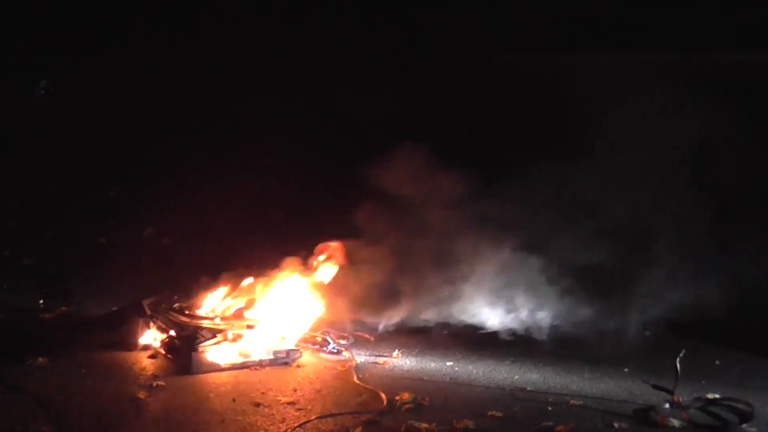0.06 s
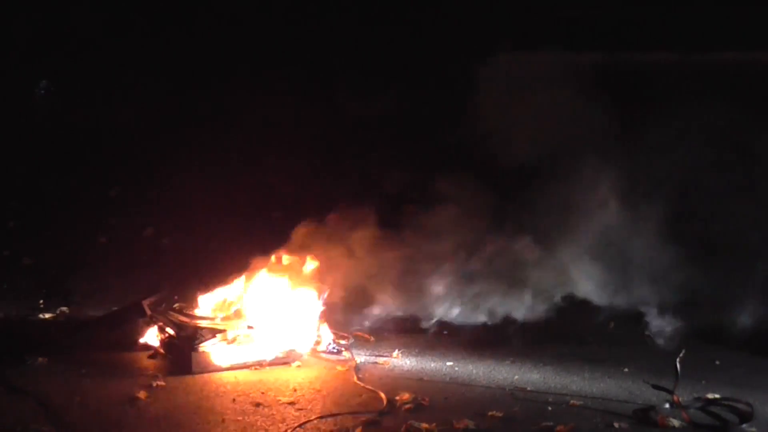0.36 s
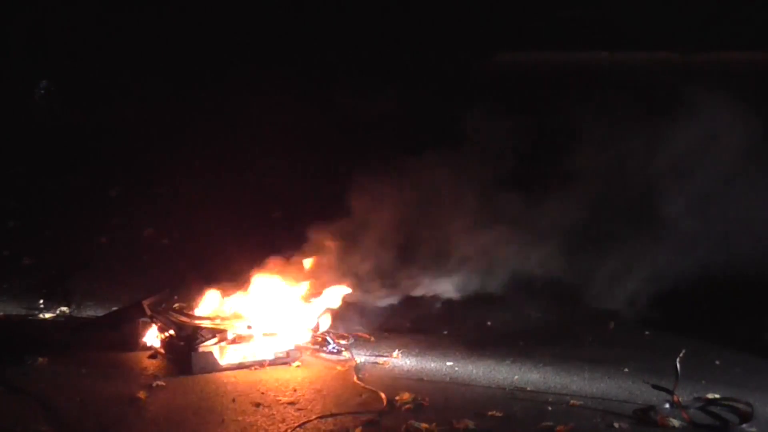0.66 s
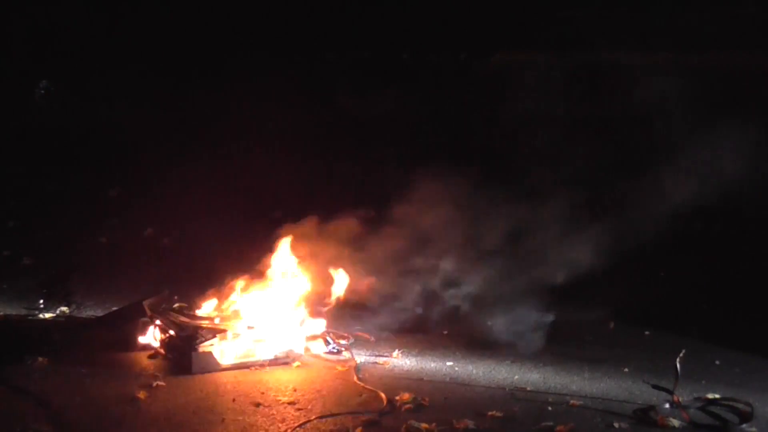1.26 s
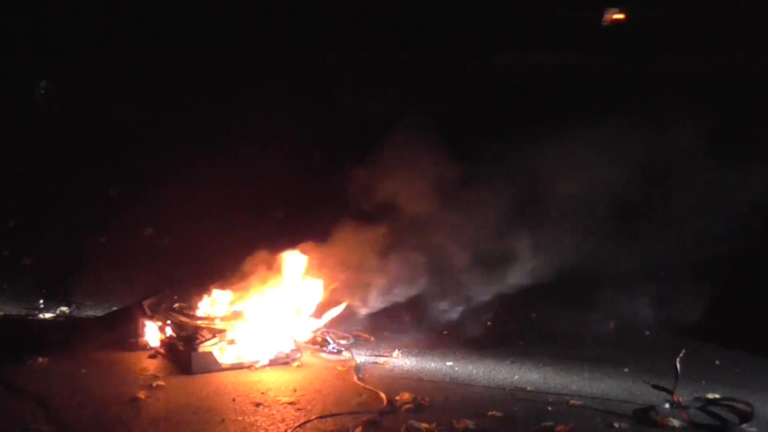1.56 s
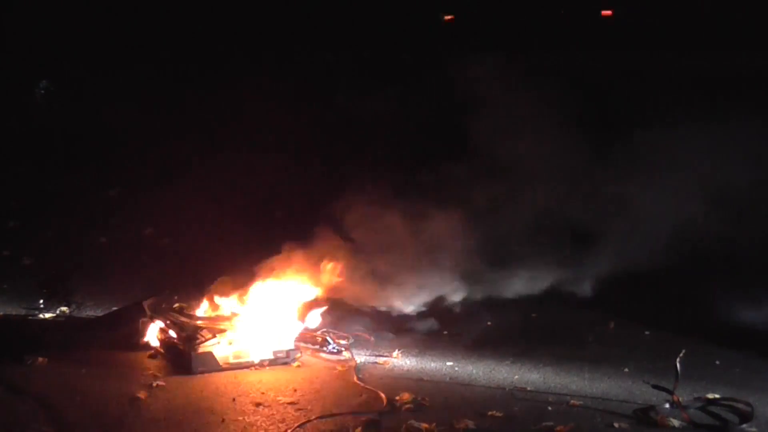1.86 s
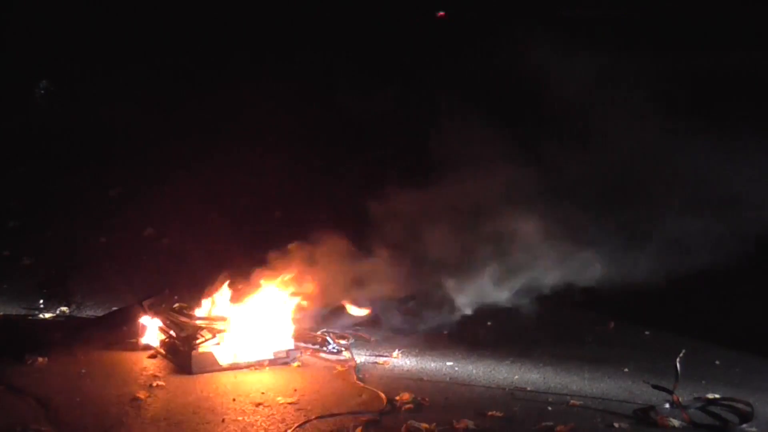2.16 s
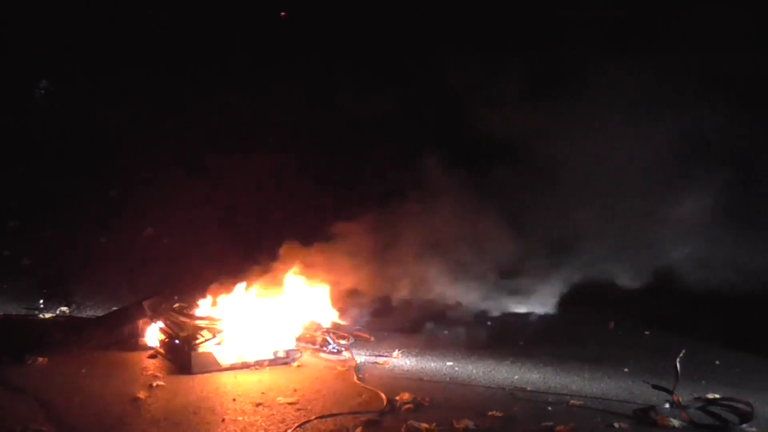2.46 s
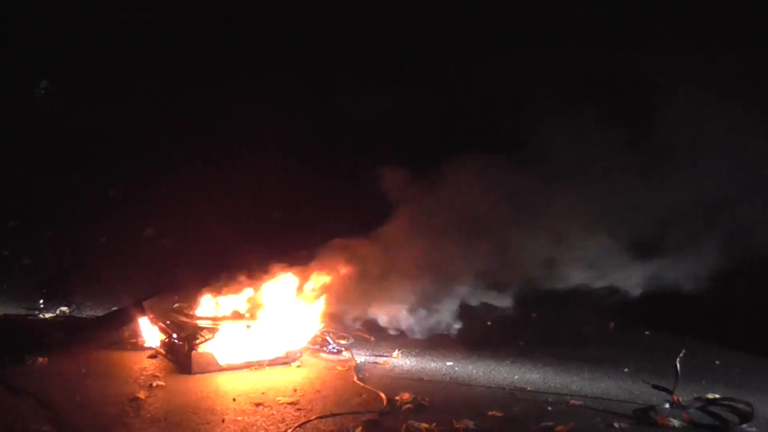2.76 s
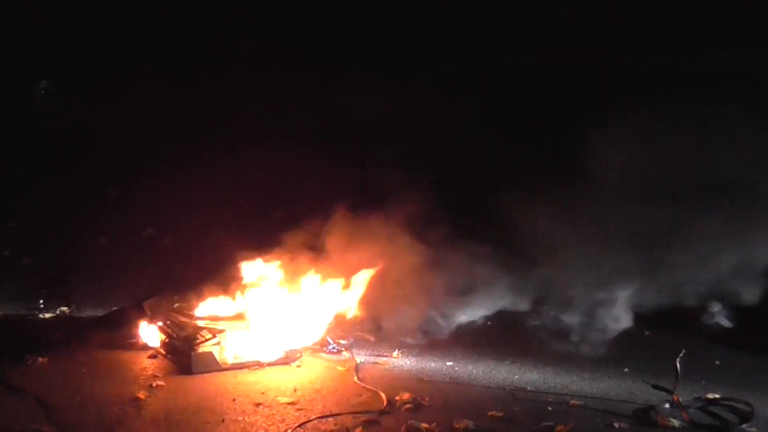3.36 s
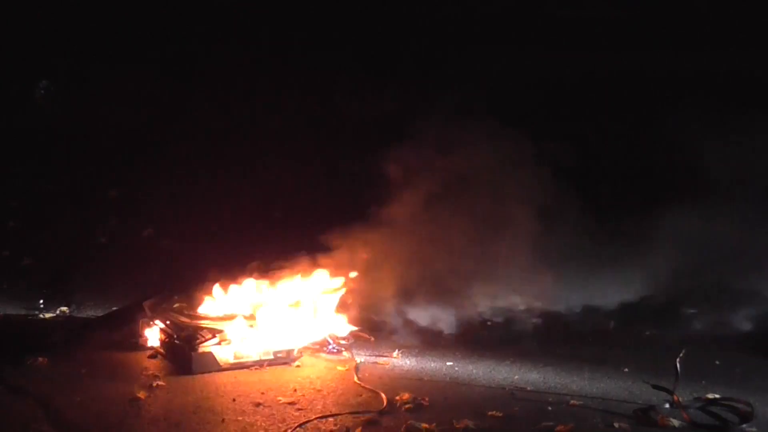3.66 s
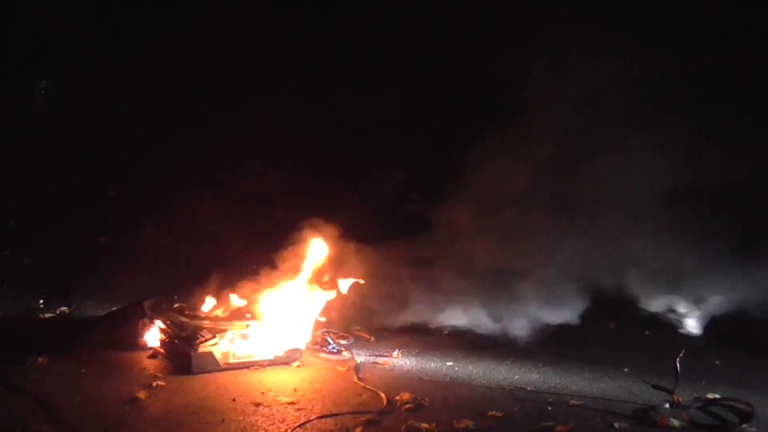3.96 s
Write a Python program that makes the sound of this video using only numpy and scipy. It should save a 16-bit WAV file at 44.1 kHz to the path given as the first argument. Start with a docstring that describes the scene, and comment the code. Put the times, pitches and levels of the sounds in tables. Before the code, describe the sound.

A fire burns outdoors with a low rush and a gas hiss that slowly grows louder. It flares, pops sharply once, then gives a puff and a few tiny snaps. An electric hum and motor drone continue behind it.

```python
"""Flames rush over a heap of wreckage burning on asphalt at night; escaping gas hisses, growing louder.
Behind the fire a steady electric hum beats against a running motor's drone, with a faint whine.
The flames flare twice; a gas pocket pops, a flame puffs and a few tiny snaps follow.
Rush, hiss and flares are turbulent noise; pop, puff and snaps are short noise bursts,
the pop with echoes and a brief ring. The machinery is wavering sines."""
import sys
import numpy as np
from scipy import signal
from scipy.fft import rfft, irfft
from scipy.io import wavfile
from scipy.ndimage import uniform_filter1d

SR = 44100
rng = np.random.default_rng(int(sys.argv[2]) if len(sys.argv) > 2 else 0)


def persist_wave(psi):
    """Save psi, clipped to +-1, as 16-bit WAV."""
    counts = np.round(np.clip(psi, -1, 1) * 32767).astype(np.int16)
    wavfile.write(sys.argv[1], SR, np.atleast_2d(counts).T)


N = 4 * SR

# Noise spectra, shape only: freq_hz, density_db
RUSH_SPECTRUM = [(20, -23), (32, -13), (44, -2), (62, -8), (85, 4.5), (130, 4.5), (200, 2), (290, -1),
                 (420, -2.5), (650, -5), (980, -3.5), (1400, -6.5), (2000, -12), (2800, -23), (5000, -30),
                 (15000, -45)]
HISS_SPECTRUM = [(1200, -21.5), (2400, -6.5), (2900, -7.5), (3400, -3.5), (4100, 0.5), (5000, 1.5),
                 (6500, -2), (8400, -6), (9600, -10), (11000, -13), (13000, -18.5), (14700, -22),
                 (15500, -48)]
FLARE_SPECTRUM = [(100, -22), (230, 10), (450, -10.5), (750, -4.5), (1250, 1), (1900, -10), (2700, -31),
                  (6000, -36)]
THUD_SPECTRUM = [(40, -30), (120, -2), (210, 5), (380, 2), (700, -5), (1080, 0), (1550, -4), (1900, -9),
                 (2100, -18), (2600, -28), (4000, -33)]
CRACK_SPECTRUM = [(2800, -22), (3700, -15), (4300, -6), (5200, -6.5), (6200, -6), (7100, 0), (7900, -3),
                  (8400, -1), (9200, -15), (10800, -17), (11700, -11), (13000, -22), (15500, -28)]
PUFF_SPECTRUM = [(90, -25), (170, 0), (300, -4), (550, -7), (800, -11), (1300, -20), (3000, -50)]
SNAP_SPECTRUM = [(1500, -28), (3200, -14), (4700, 0), (7400, 2), (10000, -8), (12200, -1), (13500, -2.5),
                 (15500, -11)]
# Left-right likeness: freq_hz, correlation
RUSH_CORRELATION = [(25, .1), (60, 0.2), (150, 0.73), (300, 0.87), (600, 0.77), (950, 0.65), (1100, 0.36),
                    (1600, 0.63), (3000, 0.43)]
HISS_CORRELATION = [(2800, 0.5), (4200, 0.78), (6500, 0.8), (8300, 0.57), (9400, -0.011), (10700, -0.33),
                    (11600, 0.17), (12700, 0.94), (15000, 0.81)]
# Stereo balance: freq_hz, left_minus_right_db
RUSH_BALANCE = [(100, 1.5), (200, -1.3), (350, 1.5), (900, 3), (1400, 1.5), (2200, 0.5)]
HISS_BALANCE = [(3000, -1), (4800, -1), (6500, -0.5), (8500, 0.2), (10700, -3.5), (12800, 0.5)]
# Level curves: time_s, level_db
HISS_LEVEL = [(0, -48), (.6, -46.5), (1.5, -44.5), (2.6, -42.5), (3.2, -42.5), (4, -43)]
DRONE_LEVEL = [(0, -38), (1.35, -41), (1.9, -45), (2.9, -43), (4, -42.5)]
WHINE_LEVEL = [(0, -72), (.55, -61), (1.05, -44.5), (1.4, -51), (1.8, -62), (2.1, -48), (2.6, -46.5),
               (3, -68), (3.6, -53), (4, -59)]
# Motor drone pitch: time_s, pitch_hz
DRONE_PITCH = [(0, 139.3), (.5, 138.4), (1.15, 137.2), (2, 136.85), (3.1, 136.5), (4, 135.9)]
# Whine partials: freq_hz, gain_db
WHINE_PARTIALS = [(412, -0.5), (823, -10.5)]
# Flare-ups: peak_s, half_width_s, level_db
FLARES = [(0.3, 0.3, -44.5), (3.9, .13, -45)]
# Thud echoes off ground and wreck: delay_s, gain_db
THUD_ECHOES = [(.0105, -14), (.0145, -16), (.026, -21)]
# Ringing modes of the pop: freq_hz, level_db, t60_s
POP_MODES = [(1572, -24.5, 0.053), (1854, -31, 0.043), (7080, -27, 0.016), (8410, -27.5, 0.016)]
# Snaps of the fire: start_s, level_db
SNAPS = [(2.1235, -39), (2.561, -30.5), (2.6388, -32)]


def amp(db):
    """Decibels to gain."""
    return 10 ** (np.asarray(db) / 20)


def unit(x):
    """Scale to unit rms."""
    return x / np.sqrt(np.mean(x ** 2) + 1e-20)


def at_hz(points, hz):
    """Read a table on a log-frequency axis."""
    freq_hz, value = np.transpose(points)
    return np.interp(np.log(hz + 1), np.log(freq_hz + 1), value)


def over_time(points):
    """Read a curve at every sample."""
    return np.interp(np.arange(N) / SR, *np.transpose(points))


def pan(db):
    """Stereo gains for a left-minus-right level."""
    return amp(np.array([[.5], [-.5]]) * db)


def colour(x, spectrum):
    """Filter by a spectrum; unit rms."""
    size = x.shape[-1]
    gain = amp(at_hz(spectrum, np.fft.rfftfreq(size, 1 / SR)))
    return unit(irfft(rfft(x) * gain, size))


def drift(rate_hz):
    """Smooth random motion up to about rate_hz; unit rms."""
    hz = np.fft.rfftfreq(N, 1 / SR)
    lowpass = (hz > 0) * np.exp(-(hz / rate_hz) ** 2)
    return unit(irfft(rfft(rng.standard_normal(N)) * lowpass, N))


def add(mix, start_s, sound):
    """Mix a sound in at start_s."""
    part = mix[:, round(start_s * SR):][:, :sound.shape[-1]]
    part += sound[..., :part.shape[-1]]


def turbulence(spectrum, correlation, balance, patchy_db):
    """Stereo noise whose level shifts in small time-frequency patches."""
    size = 2048
    hz = np.fft.rfftfreq(size, 1 / SR)
    mid, side = signal.stft(rng.standard_normal((2, N)), nperseg=size)[2]
    patches = uniform_filter1d(rng.standard_normal(mid.shape), size=24, axis=0)
    patches = unit(uniform_filter1d(patches, size=3, axis=1))
    likeness = np.clip(at_hz(correlation, hz), -1, 1)[:, None]
    mid, side = mid * np.sqrt(1 + likeness), side * np.sqrt(1 - likeness)
    frames = np.array([mid + side, mid - side]) * amp(patchy_db * patches)
    frames *= pan(at_hz(balance, hz))[:, :, None]
    return colour(signal.istft(frames, nperseg=size)[1][:, :N], spectrum)


def tone(hz):
    """Unit-rms sine following a pitch."""
    return np.sqrt(2) * np.cos(2 * np.pi * np.cumsum(hz * np.ones(N)) / SR)


def burst(spectrum, attack_s, hold_s, t60_s, width):
    """Short gas release: coloured noise swells, holds, dies."""
    t = np.arange(SR // 4) / SR
    rise = np.sin(np.pi / 2 * np.minimum(t / attack_s, 1)) ** 2
    envelope = rise * np.exp(-np.log(1000) * np.maximum(t - attack_s - hold_s, 0) / t60_s)
    mid, side = (unit(colour(rng.standard_normal(len(t)), spectrum) * envelope) for _ in range(2))
    return np.array([mid + width * side, mid - width * side]) * np.sqrt(np.mean(envelope ** 2))


def flame_rush(level_db=-39):
    """Turbulent flames: a low, steady rush."""
    return amp(level_db) * turbulence(RUSH_SPECTRUM, RUSH_CORRELATION, RUSH_BALANCE, patchy_db=1.0)


def gas_hiss():
    """A gas jet slowly gains strength, then levels off."""
    jet = turbulence(HISS_SPECTRUM, HISS_CORRELATION, HISS_BALANCE, patchy_db=0.82)
    return amp(over_time(HISS_LEVEL)) * jet


def electric_hum(pitch_hz=120, level_db=-35.5, waver_db=0.2):
    """Electric hum at constant pitch."""
    return amp(level_db + waver_db * drift(rate_hz=4)) * tone(pitch_hz)


def motor_drone(waver_db=0.63):
    """A running motor sags slowly in pitch, beating against the hum."""
    level_db = over_time(DRONE_LEVEL) + waver_db * drift(rate_hz=1.6)
    return amp(level_db) * tone(over_time(DRONE_PITCH))


def whine(waver_db=2.0, wander_hz=0.4):
    """A thin two-partial whine comes and goes."""
    level_db = over_time(WHINE_LEVEL) + waver_db * drift(rate_hz=7.9)
    partials = sum(amp(db) * tone(hz + wander_hz * drift(rate_hz=2.9)) for hz, db in WHINE_PARTIALS)
    return amp(level_db) * partials


def whistle(pitch_hz=988, level_db=-60, waver_db=0.96, wander_hz=0.8):
    """A very faint, continuous tone above the whine."""
    gain = amp(level_db + waver_db * drift(rate_hz=2.5))
    return gain * tone(pitch_hz + wander_hz * drift(rate_hz=6))


def flares():
    """Flames flare briefly with a hollow roar."""
    t = np.arange(N) / SR
    swell = sum(amp(db) * np.exp(-((t - peak_s) / half_s) ** 2) for peak_s, half_s, db in FLARES)
    return swell * turbulence(FLARE_SPECTRUM, RUSH_CORRELATION, RUSH_BALANCE, patchy_db=2.5)


def gas_pop(start_s=0.6447, thud_db=-23, crack_db=-24.3, crack_lag_s=0.0008, ring_lag_s=0.0024):
    """A gas pocket bursts: dull thud with echoes, bright crack, brief ring."""
    out = np.zeros((2, N))
    thud = burst(THUD_SPECTRUM, attack_s=0.0026, hold_s=0.0022, t60_s=0.015, width=0.18)
    for delay_s, gain_db in [(0, 0), *THUD_ECHOES]:
        add(out, start_s + delay_s, amp(thud_db + gain_db) * pan(db=-1.5) * thud)
    crack = burst(CRACK_SPECTRUM, attack_s=0.0025, hold_s=0.0018, t60_s=0.014, width=0.37)
    add(out, start_s + crack_lag_s, amp(crack_db) * crack)
    t = np.arange(SR // 4) / SR
    for freq_hz, level_db, t60_s in POP_MODES:
        ring = amp(level_db - 60 * t / t60_s) * np.sin(2 * np.pi * freq_hz * t)
        add(out, start_s + ring_lag_s, ring)
    return out


def flame_puff(start_s=1.63, level_db=-37.5):
    """One soft, low puff of flame."""
    out = np.zeros((2, N))
    puff = burst(PUFF_SPECTRUM, attack_s=0.016, hold_s=0.025, t60_s=0.087, width=0.23)
    add(out, start_s, amp(level_db) * puff)
    return out


def snaps():
    """The fire gives tiny, bright snaps."""
    out = np.zeros((2, N))
    for start_s, level_db in SNAPS:
        snap = burst(SNAP_SPECTRUM, attack_s=0.0002, hold_s=0.00034, t60_s=0.0036, width=0.3)
        add(out, start_s, amp(level_db) * pan(db=-1.8) * snap)
    return out


def scene():
    """The fire, with machinery behind it."""
    fire = flame_rush() + flares() + gas_hiss()
    machinery = pan(db=-1.55) * (electric_hum() + motor_drone())
    machinery += pan(db=2.0) * (whine() + whistle())
    return fire + machinery + gas_pop() + flame_puff() + snaps()


def record(dry):
    """Steep low-pass on the top treble."""
    cutoff_hz = 15800
    lowpass = signal.firwin(511, cutoff_hz, window=("kaiser", 9), fs=SR)
    return signal.oaconvolve(dry, lowpass[None], "same")


dry = scene()
out = record(dry)
persist_wave(out)
```